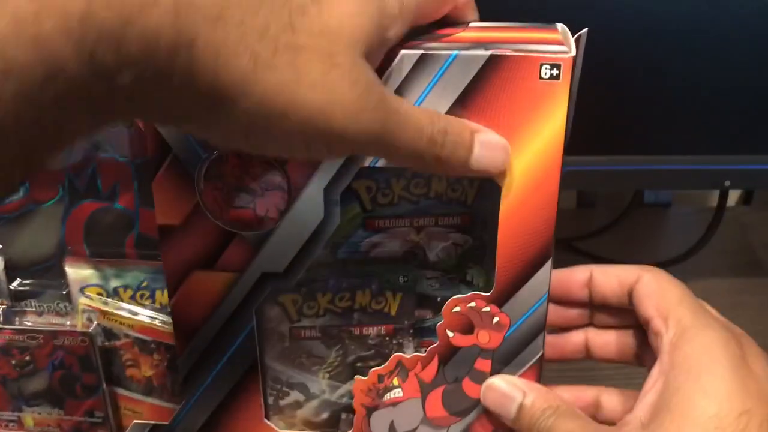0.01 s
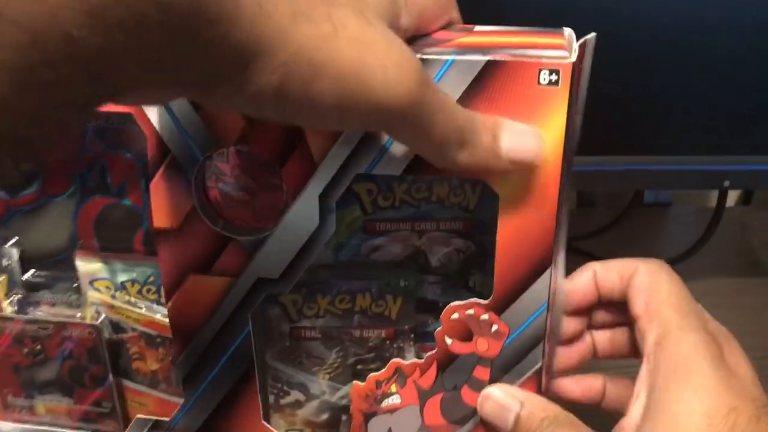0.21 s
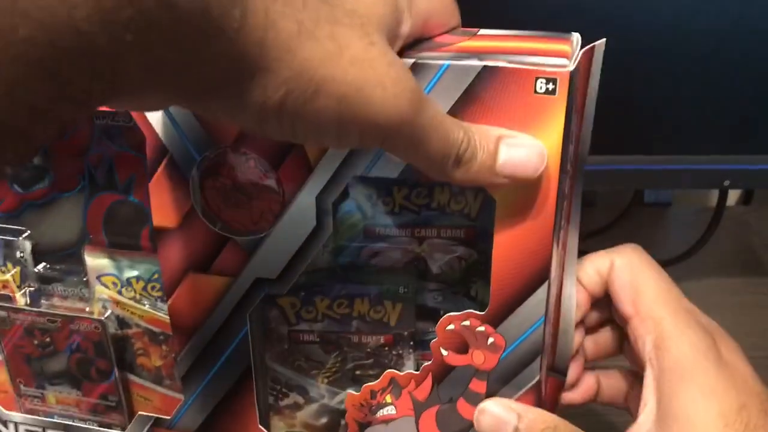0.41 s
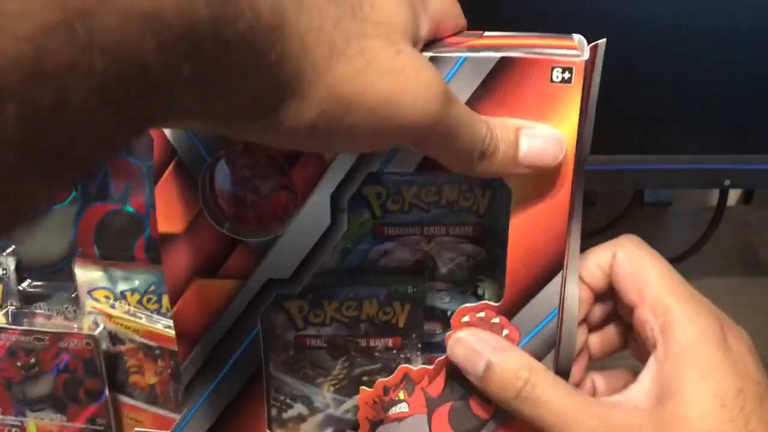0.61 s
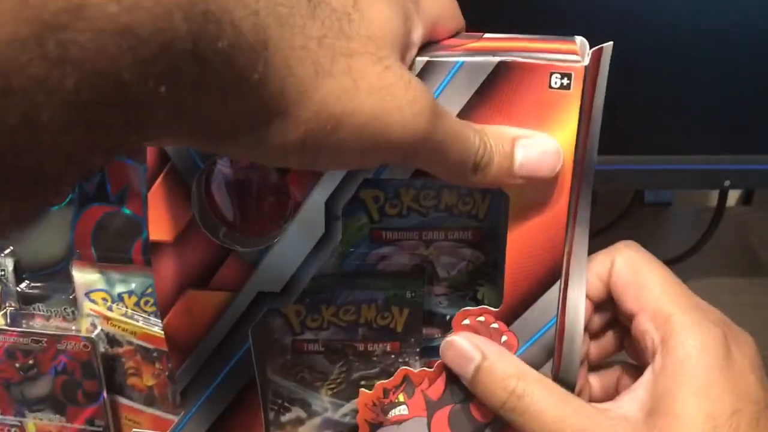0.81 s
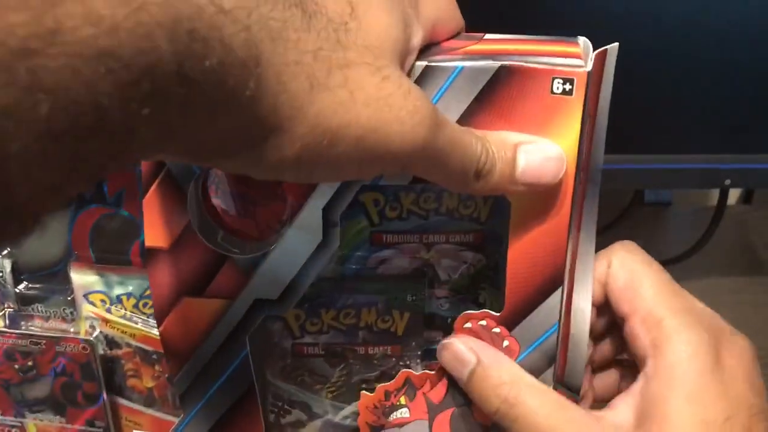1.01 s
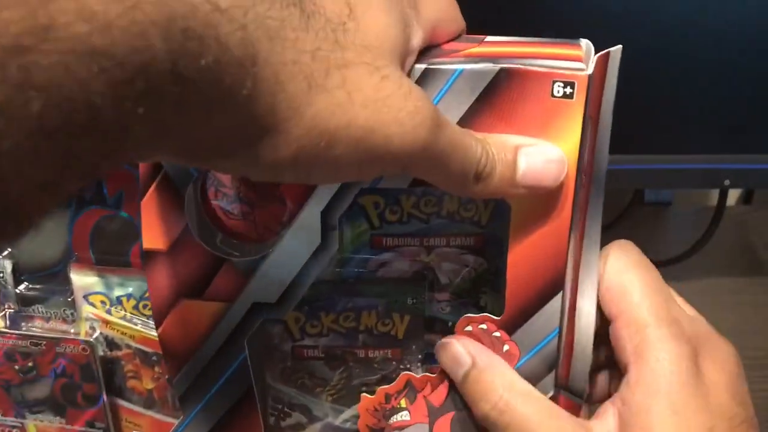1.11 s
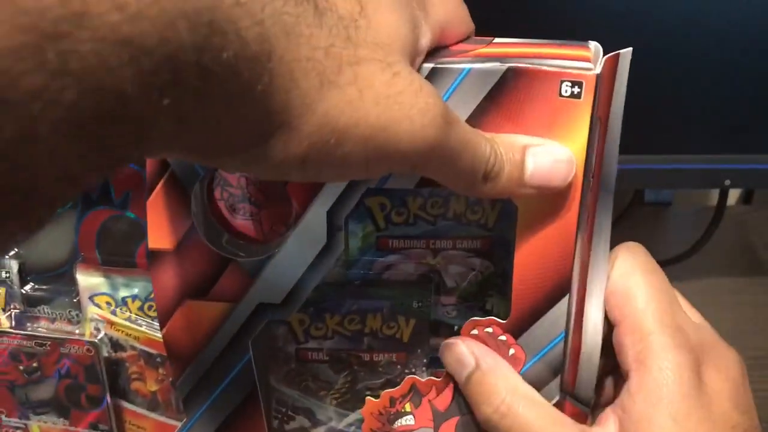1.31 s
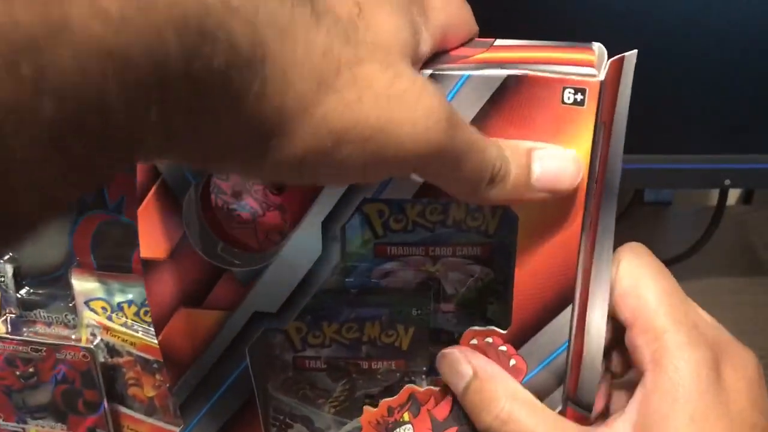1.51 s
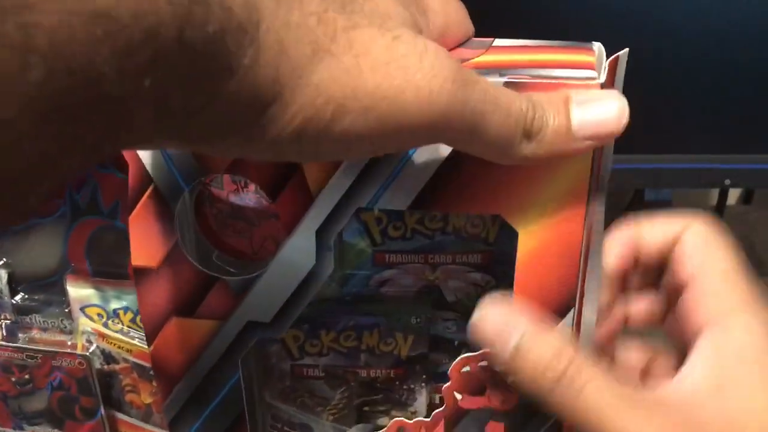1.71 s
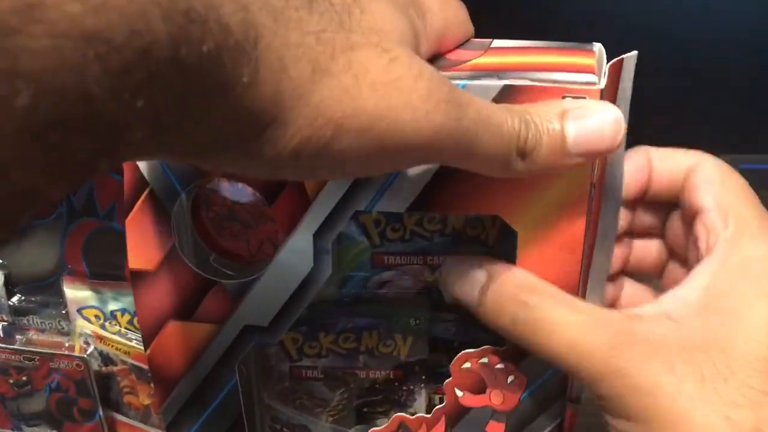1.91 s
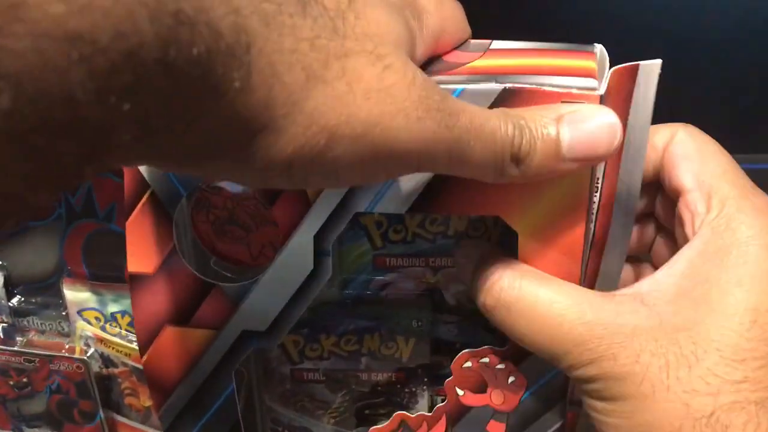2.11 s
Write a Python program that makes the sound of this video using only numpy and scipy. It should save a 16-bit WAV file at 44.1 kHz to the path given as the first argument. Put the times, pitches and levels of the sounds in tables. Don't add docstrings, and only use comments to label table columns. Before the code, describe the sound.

Thin cardboard box flap being torn open, close to a phone in a quiet, low-humming room. After a faint finger brush, the glue seam rips in rapid cracking jerks at 0.22-0.33 s, creaking until 0.5. A hissing finger slide swells around 0.66 with a pop at 0.7; a hard, bright snap hits at 0.9. Then soft flexing and scuffs, a loud panel pop at 1.18, faint ones at 1.6 and 1.77, and a cluster from 2.08 to 2.18.

```python
import sys
import numpy as np
from scipy import signal
from scipy.fft import rfft, irfft
from scipy.io import wavfile
from scipy.ndimage import uniform_filter1d

SR = 44100
rng = np.random.default_rng(int(sys.argv[2]) if len(sys.argv) > 2 else 0)


def level_to_linear(level):
    exponent = np.asarray(level, float) / 20
    return 10 ** exponent


def output_pcm(signal):
    pcm = np.clip(np.atleast_2d(signal).T, -1, 1) * 32767
    wavfile.write(sys.argv[1], SR, np.round(pcm).astype(np.int16))


N = 97020

# f/Hz, level/dB
ROOM_COLOUR = [(21, -38), (36, 7.5), (217, -5.5), (531, -38.5), (4240, -24), (6560, -29), (11200, -30.5),
               (15300, -31), (16500, -77)]
# t/s, flexing level/dB, grip rumble level/dB
BENDING = [(0, -43.5, -44), (.09, -57, -56), (.2, -52, -75), (.27, -24, -43), (.43, -33, -40),
           (.5, -47, -47), (.58, -45.5, -55.5), (.67, -35.5, -46), (.75, -36, -34), (.81, -49, -49),
           (.97, -43, -77), (1.06, -53.5, -58), (1.25, -40.5, -45.5), (1.46, -52, -90), (1.56, -57.5, -85),
           (1.68, -44, -59), (1.87, -52.5, -75), (2.1, -44.5, -56)]
# f/Hz, level/dB
BOARD_COLOUR = [(71, -26), (120, -1), (225, 1), (388, -1), (423, -3.5), (564, -3), (1280, -5.5), (1540, -9),
                (7000, -32.5), (9100, -75), (15400, -120)]
# start t/s, loudest t/s, end t/s, level/dB, dullness/dB
FINGER_SLIDES = [
    (-.08, 0.036, 0.12, -50, 0),
    (0.208, 0.32, 0.48, -38, 2),
    (0.556, 0.66, 0.76, -29, 2),
    (0.757, 0.78, 0.93, -58.5, -7.5),
    (0.894, 0.906, 1.052, -49.5, -8.5),
    (1.096, 1.25, 1.6, -60.5, 2),
    (1.578, 1.725, 1.73, -47, 3),
    (1.637, 1.85, 2.003, -45, -2),
    (1.956, 2.156, 2.21, -59.5, -8.5),
]
# f/Hz, level/dB
SKIN_COLOUR = [(590, -25), (1000, -2), (4180, -1.5), (4760, -8.5), (5230, -4.5), (6530, -4.5),
               (14700, -11.5), (15900, -11), (16500, -42)]
# start t/s, length/s, rms level/dB, centre f/Hz
CARD_SCUFFS = [(0.269, 0.095, -28.5, 2250), (0.333, 0.084, -32, 1900), (0.885, 0.011, -46, 1160),
               (1.143, 0.059, -39, 1530), (1.267, 0.0067, -35.5, 2630), (1.479, 0.0076, -38, 2460),
               (1.624, 0.005, -38, 2600), (1.645, 0.063, -41, 1180), (1.725, 0.022, -33.5, 1490),
               (1.967, 0.0081, -33, 1480), (1.994, 0.015, -40.5, 1640), (2.007, 0.032, -43, 2170),
               (2.034, 0.015, -41.5, 1310), (2.085, 0.019, -43, 1200), (1.454, .012, -45, 1230),
               (1.461, 0.055, -41.5, 960), (1.2, 0.091, -46.5, 1800), (1.297, 0.12, -50, 1310),
               (1.39, 0.045, -49.5, 1200), (2.096, .007, -44.5, 2300), (0.971, 0.044, -41.5, 700),
               (1.494, 0.014, -49, 2780)]
# t/s, peak level/dB, tilt/(dB per octave), pitch ratio
PANEL_POPS = [
    (.6965, -11, 2.5, 1.02),
    (.9459, -10.5, 4, 1.15),
    (1.1762, -7.5, 4, 1.18),
    (1.6042, -25.5, -2, 1.01),
    (1.7653, -23.5, -2, 1),
    (2.0793, -21, -1, 1.01),
    (2.0824, -21.5, -0.5, 1.01),
    (2.0845, -19.5, 4.5, 1.09),
    (2.1326, -14.5, 0.9, 0.98),
    (2.1774, -13.5, 1, 1.06),
]
# f/Hz, level/dB, time to fall 60 dB/s
POP_TONES = [(340, -0.5, 0.071), (437, -3.5, 0.072), (700, 6.5, 0.025), (853, -7, 0.028), (1200, -8, 0.041),
             (1610, -4, 0.036), (2100, -11.5, .015), (2900, -8, 0.0088)]
# f/Hz, level/dB, time to fall 60 dB/s
PANEL_TONES = [(136, -39, 0.14), (182, 0, 0.079), (239, 2, 0.15), (341.6, -7.5, 0.17), (415, 1, 0.049),
               (598, -0.5, 0.064), (724, -1, 0.066), (877, 6.5, 0.021), (1101, -4.5, 0.065),
               (1370, 6.5, 0.012), (1580, 1, 0.047), (2014, 10.5, 0.019), (2470, -3.5, 0.004),
               (3000, 10, 0.0031)]
# t/s, slip rate/Hz, level/dB
SEAM_CREAK = [
    (.262, 106.5, -30),
    (.28, 120.6, -17),
    (.325, 121, -25),
    (.345, 180, -23),
    (.395, 185, -27),
    (.415, 115, -23),
    (.447, 78, -31.5),
    (.46, 88, -34),
    (.5, 77.5, -46),
]
# t/s, peak level/dB, centre f/Hz
GLUE_SNAPS = [(0.219, -27, 8310), (0.2457, -16.5, 6030), (0.2634, -18, 5670), (0.274, -20, 6450),
              (0.286, -26, 5970), (0.2936, -16.5, 8900), (0.2988, -18.5, 6190), (0.3144, -17, 4250),
              (0.3232, -16.5, 6800), (0.3302, -17.5, 6060), (0.3466, -19.5, 6760), (0.385, -20.5, 7500),
              (0.4194, -29, 6050), (0.6956, -15, 5360), (0.7282, -26, 5140), (0.7807, -11.5, 12700),
              (0.853, -29.5, 12900), (0.9027, -15.5, 4650), (0.9029, -5.5, 12900), (1.0133, -22.5, 12300),
              (1.2676, -52, 4800), (1.4785, -43, 4570), (1.511, -30, 11200), (1.6265, -35, 5160),
              (1.7281, -28, 5000), (2.0366, -29, 7400), (2.185, -24, 7000), (1.278, -40.5, 5000),
              (1.43, -52, 3500), (1.558, -46, 4500), (1.7635, -38, 13000), (2.157, -32, 6000),
              (1.164, -47, 4000), (.566, -49, 2000)]
# t/s, peak level/dB, centre f/Hz, length/ms
FIBRE_RIPS = [(0.218, -29.5, 2740, 4.7), (0.342, -24, 2800, 2.7), (.349, -30, 2200, 3),
              (0.359, -22, 1480, 4.3), (.368, -20, 1500, 6.1), (.39, -20, 1590, 4.2),
              (0.399, -24, 1900, 3.3), (0.411, -23, 1810, 3.4), (0.42, -23, 3000, 4.4),
              (0.9031, -8, 2080, 3.5), (0.9026, -10, 4960, 3.6), (1.6275, -31, 2900, 2.6),
              (1.662, -33, 1390, 4.5), (1.727, -29.5, 1660, 8.4), (1.968, -32, 1550, 3.2),
              (1.453, -39, 1240, 4.6)]
# t/s, peak level/dB, centre f/Hz, contact/ms
PANEL_KNOCKS = [
    (0.219, -24, 637, 3.3),
    (0.401, -16.5, 750, 3.8),
    (.421, -32, 800, 3.3),
    (.696, -23, 503, 2),
    (0.804, -27.5, 860, 3.7),
    (0.9023, -14, 2400, 4),
]
# t/s, peak level/dB
SEAM_JERKS = [
    (0.247, -7.5),
    (0.263, -5.5),
    (0.276, -11.5),
    (0.284, -13),
    (0.293, -16),
    (0.3, -6.5),
    (0.313, -7.5),
    (0.324, -10.5),
]


def shape(x, points):
    p = np.array(points)
    f = np.arange(N // 2 + 1) * SR / N + 1
    gain_db = np.interp(np.log(f), np.log(p[:, 0]), p[:, 1], left=-80)
    y = irfft(rfft(x) * level_to_linear(gain_db), N)
    return y / np.std(y)


def walk(rate):
    hold = int(SR / rate)
    steps = np.repeat(rng.standard_normal(N // hold + 1), hold)
    return 1.3 * uniform_filter1d(uniform_filter1d(steps, hold), hold)[:N]


def curve(table, axis):
    p = np.array(table)
    return np.interp(np.arange(N) / SR, p[:, 0], p[:, axis])


def band(x, hz, octaves):
    edges = np.clip([hz / 2 ** (octaves / 2), hz * 2 ** (octaves / 2)], 20, SR / 2.1)
    return signal.sosfilt(signal.butter(2, edges, "bandpass", fs=SR, output="sos"), x)


def steep_band(x, hz, octaves):
    return band(band(x, hz, octaves), hz, octaves)


def lowpass(x, hz):
    return signal.sosfilt(signal.butter(4, hz, fs=SR, output="sos"), x)


def decay(t, t60):
    return np.exp(-np.log(1000) * t / t60)


def add(out, s, x, db):
    i = int(s * SR)
    x = x[:N - i]
    out[i:i + len(x)] += x * level_to_linear(db) / np.max(np.abs(x))


def room_tone():
    return shape(rng.standard_normal(N), ROOM_COLOUR) * level_to_linear(-53.5 + 0.35 * walk(2.8))


def room_echo(box):
    t = np.arange(12000) / SR
    tail = rng.standard_normal(len(t)) * decay(t, 0.3) * (t > .004)
    return level_to_linear(-20) * signal.fftconvolve(box, tail / np.sqrt(np.sum(tail ** 2)))[:N]


def bending():
    ticks_per_s, tick_ms, rumble_hz = 900, 2.5, 101.4
    tick_level = level_to_linear(0.71 * np.minimum(rng.exponential(size=N), 3.0))
    ticks = (rng.random(N) < ticks_per_s / SR) * tick_level
    gate = signal.lfilter([1], [1, -np.exp(-1000 / SR / tick_ms)], ticks)
    gate = uniform_filter1d(gate, size=40)
    crackle = (gate + 2.5) * rng.standard_normal(N)
    board = shape(crackle, BOARD_COLOUR) * level_to_linear(1.5 * walk(25))
    rumble = steep_band(rng.standard_normal(N), rumble_hz, 2.4)
    rumble_level = level_to_linear(curve(BENDING, axis=2) + 2 * walk(8.2))
    return level_to_linear(curve(BENDING, axis=1)) * board + rumble_level * rumble / np.std(rumble)


def slides():
    t = np.arange(N) / SR
    noise = rng.standard_normal(N) * level_to_linear(1.7 * walk(300) + 0.23 * walk(39.42))
    hiss = shape(noise, SKIN_COLOUR)
    dull = band(hiss, 1270, 4.58)
    out = np.zeros(N)
    for start, loudest, end, db, dull_db in FINGER_SLIDES:
        swell = np.sin(np.pi / 2 * np.interp(t, [start, loudest, end], [0, 1, 0])) ** 2.1
        stroke = hiss * level_to_linear(-dull_db) + dull * (level_to_linear(dull_db) - level_to_linear(-dull_db))
        out += swell * level_to_linear(db) * stroke
    return out


def scuffs():
    out, t = np.zeros(N), np.arange(N) / SR
    grit = rng.standard_normal(N) * level_to_linear(4.1 * walk(500))
    for s, length, db, hz in CARD_SCUFFS:
        colour = band(grit, hz, 1.12)
        swell = np.interp(t, [s, s + 0.31 * length, s + length], [0, 1, 0])
        out += level_to_linear(db) * swell * colour / np.std(colour)
    return out


def pops():
    blow_hz, blow_ms, blow_db = 1027, 0.62, 4
    lag_ms = 0.63
    out, t = np.zeros(N), np.arange(3000) / SR
    mode_hz, mode_db, t60 = np.array(POP_TONES).T[:, :, None]
    late = t - .0009
    for s, db, tilt_db, ratio in PANEL_POPS:
        f = mode_hz * ratio * (1 + .015 * rng.standard_normal(mode_hz.shape))
        rise = 1 - np.exp(-(t * 1000 / lag_ms * (f / 1000) ** 2) ** 2)
        waves = np.cos(2 * np.pi * f * late) * decay(t, t60)
        mode_level = level_to_linear(mode_db + tilt_db * np.log2(mode_hz / 1000))
        ringing = np.sum(mode_level * rise * waves, axis=0)
        hard = 2 ** (tilt_db / 6)
        bump = np.exp(-(late * 1000 * hard / blow_ms) ** 2)
        blow = level_to_linear(blow_db) * np.cos(2 * np.pi * blow_hz * hard * late) * bump
        add(out, s, lowpass(blow + ringing, 4260), db)
    return out


def ring(centre_hz, chance, width_oct):
    late_lows_db, lag_cycles = -2.5, 1
    hz, db, t60 = np.repeat(np.array(PANEL_TONES), 2, axis=0).T[:, :, None]
    t = np.arange(5000) / SR
    hz = hz * (1 + .035 * chance[0][:, None])
    lows = level_to_linear(late_lows_db) * (hz < 500) * (hz > 200) * min(800 / centre_hz, 1) ** 2
    distance = np.log2(hz / centre_hz)
    below_db = -6 * (np.minimum(distance, 0) / width_oct) ** 2
    above_db = -7.5 * (np.maximum(distance, 0) / 1.4 / width_oct) ** 4
    hump = level_to_linear(below_db + above_db)
    rise = 1 - np.exp(-(t * hz / lag_cycles) ** 2)
    direction = np.sign(chance[2][:, None] + 1)
    waves = np.sin(2 * np.pi * hz * t) * decay(t, t60) * direction
    level = level_to_linear(db + chance[1][:, None])
    out = band(np.sum(level * (hump + lows * rise) * waves, axis=0), centre_hz, 3.7)
    return lowpass(out, min(2.34 * centre_hz * width_oct / 0.86, 9000))


def creak():
    grit_ms, grit_db = 4.4, -8
    t = np.arange(N) / SR
    phase = np.cumsum(curve(SEAM_CREAK, axis=1) * (1 + .025 * walk(90))) / SR
    slips = np.diff(np.floor(phase), prepend=0) * level_to_linear(2 * walk(148.1))
    active = (t > SEAM_CREAK[0][0]) * (t < SEAM_CREAK[-1][0])
    drive = slips * level_to_linear(curve(SEAM_CREAK, axis=2)) * active
    chance = rng.standard_normal((3, 2 * len(PANEL_TONES)))
    body = band(ring(343, chance, 1.77), 610, 4.33)
    body_gain = np.sqrt(SR / 150 / np.sum(body ** 2))
    gate = signal.lfilter([1], [1, -np.exp(-1000 / SR / grit_ms)], drive)
    grit = steep_band(gate * rng.standard_normal(N), 2200, 1.0) * level_to_linear(grit_db + 7)
    return grit + signal.fftconvolve(drive, body)[:N] * body_gain


def snaps():
    burst_ms, tail_ms, tail_db = 0.8, 13.5, -29
    out, t = np.zeros(N), np.arange(2500) / SR
    for s, db, hz in GLUE_SNAPS:
        fall = np.exp(-t * 1000 / burst_ms) + level_to_linear(tail_db) * np.exp(-t * 1000 / tail_ms)
        burst = rng.standard_normal(len(t)) * (1 - np.exp(-t / 0.0012)) * fall
        fizz = 1.83 * min(7000 / hz, 1) ** 2 * band(burst, 10300, 4.3)
        add(out, s + 0.00061, band(burst, hz, 0.36) + fizz, db)
    return out


def tearing():
    out, t = np.zeros(N), np.arange(900) / SR
    jerk_rips = [(s, db - 6.5, 2140, 4.4) for s, db in SEAM_JERKS]
    for s, db, hz, ms in jerk_rips + FIBRE_RIPS:
        u = t * 1000 / ms
        noise = rng.standard_normal(len(t)) * np.minimum(5 * u, 1) * np.exp(-u ** 2.8)
        add(out, s, steep_band(noise, hz, 2.16), db)
    return out


def knocks():
    rise_s, rattle_db, rattle_hz = .0012, -10, 3370
    out, t = np.zeros(N), np.arange(800) / SR
    rows = [(s, db, hz, ms, 0.86) for s, db, hz, ms in PANEL_KNOCKS]
    rows += [(s, db, 1170, 2.6, 1.5) for s, db in SEAM_JERKS]
    for s, db, hz, ms, width_oct in rows:
        chance = rng.standard_normal((3, 2 * len(PANEL_TONES)))
        noise = rng.standard_normal((2, len(t)))
        fade = np.exp(-t * 1000 / max(ms, .1))
        push = (t == 0) + 0.092 * fade * noise[0] ** 3 / 3
        add(out, s + rise_s, signal.fftconvolve(ring(hz, chance, width_oct), push), db)
        rattle = band(fade * noise[1], rattle_hz * hz / 2000, 1.0)
        add(out, s + rise_s, rattle, db + rattle_db)
    return out


def scene():
    box = bending() + slides() + scuffs() + pops() + creak() + snaps() + tearing() + knocks()
    return (box + room_echo(box) + room_tone())[None]


def low_pass(x):
    return signal.sosfilt(signal.butter(12, 16810, fs=SR, output="sos"), x)


def record(dry):
    rounded = np.tanh(1.24 * dry) / 1.368
    cut = signal.ellip(8, .3, 45, 15900, fs=SR, output="sos")
    return low_pass(signal.sosfilt(cut, rounded))


dry = scene()
out = record(dry)
output_pcm(out)
```